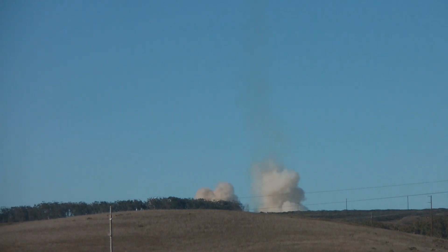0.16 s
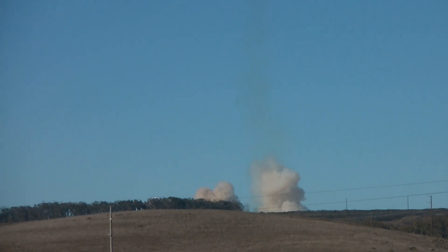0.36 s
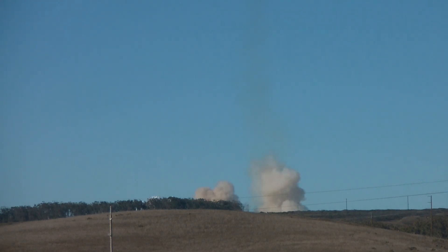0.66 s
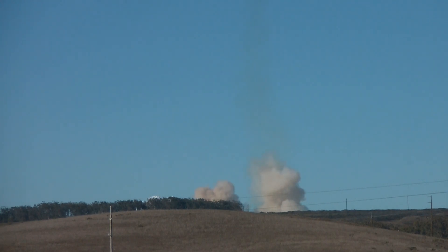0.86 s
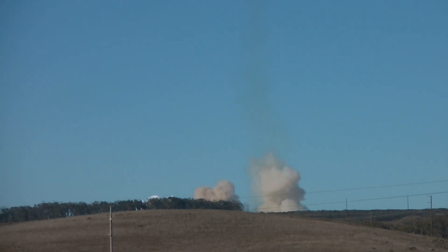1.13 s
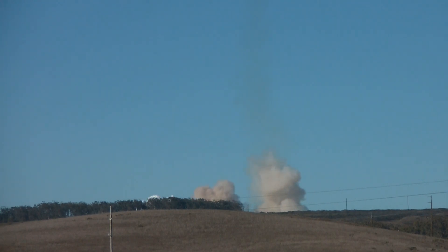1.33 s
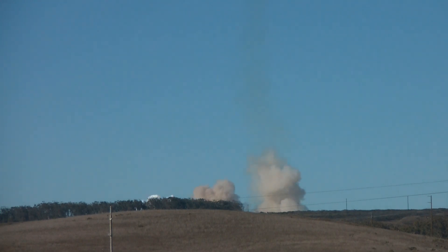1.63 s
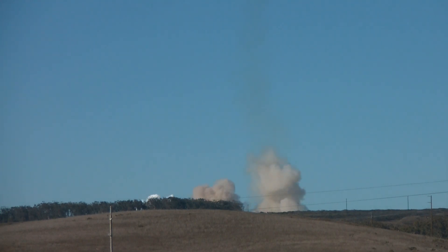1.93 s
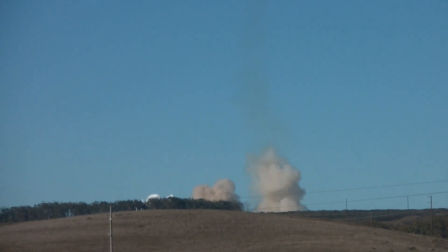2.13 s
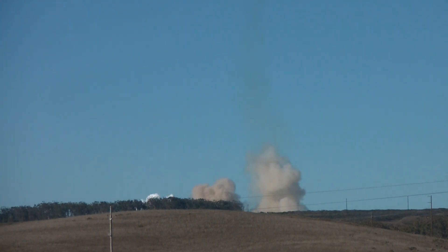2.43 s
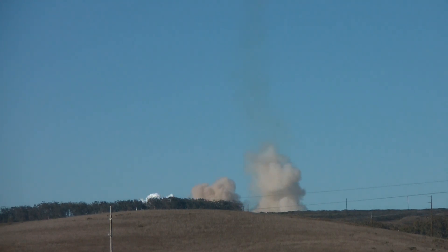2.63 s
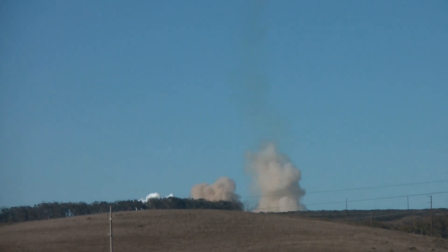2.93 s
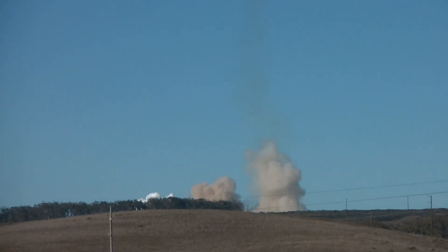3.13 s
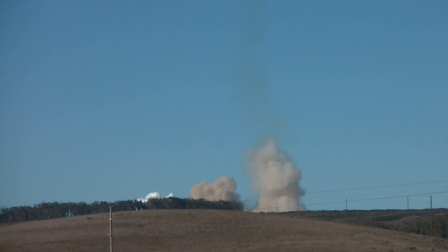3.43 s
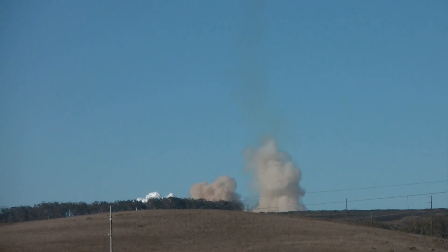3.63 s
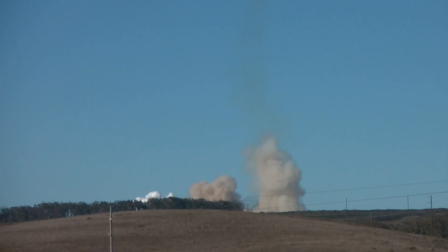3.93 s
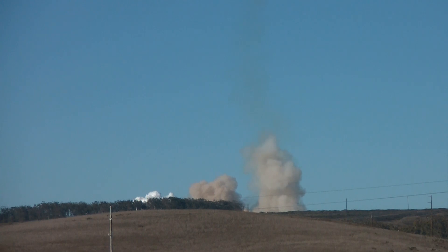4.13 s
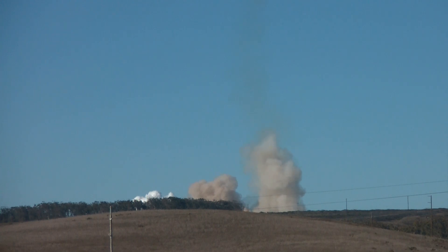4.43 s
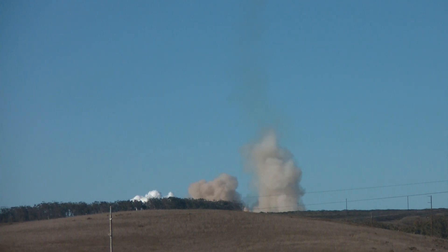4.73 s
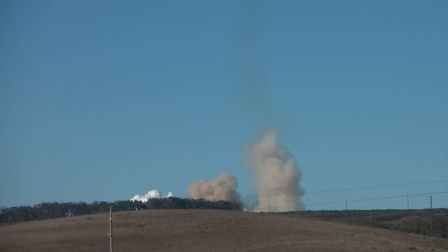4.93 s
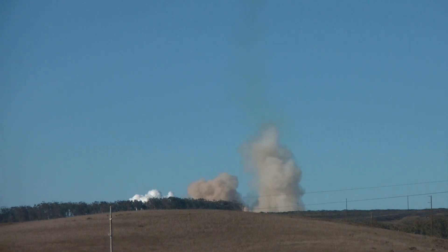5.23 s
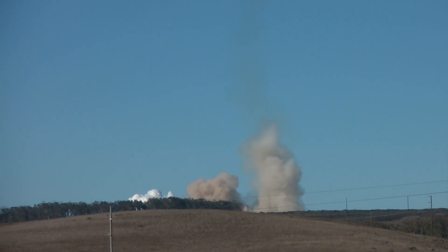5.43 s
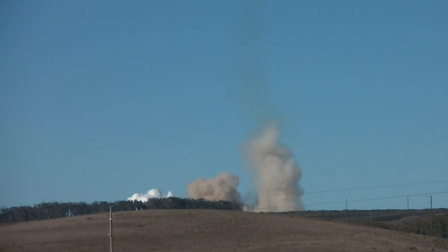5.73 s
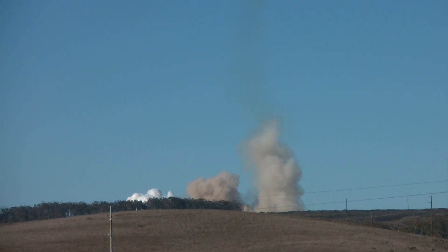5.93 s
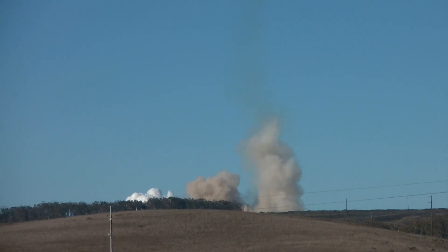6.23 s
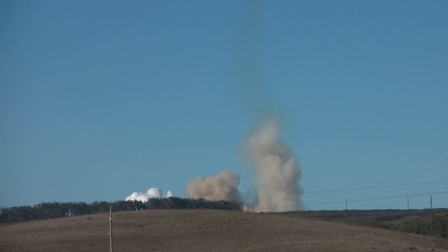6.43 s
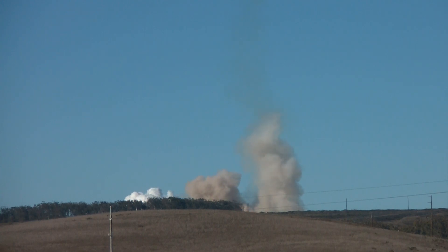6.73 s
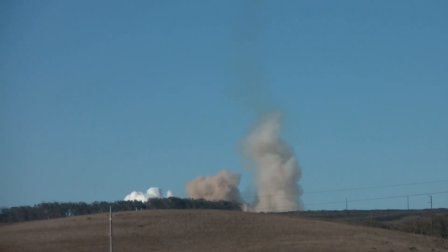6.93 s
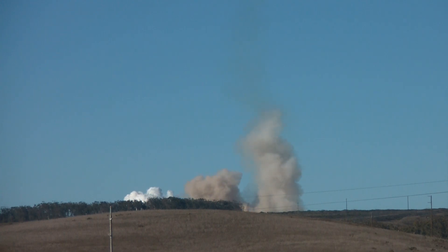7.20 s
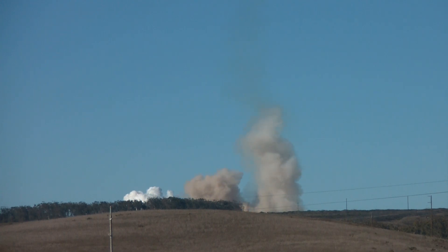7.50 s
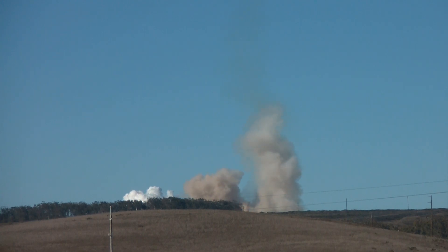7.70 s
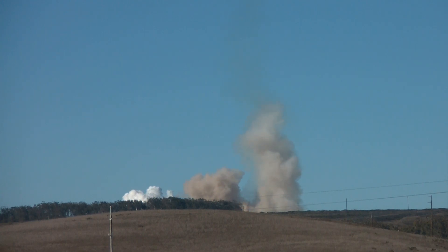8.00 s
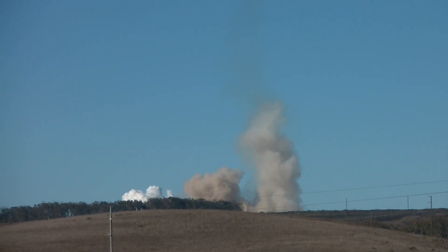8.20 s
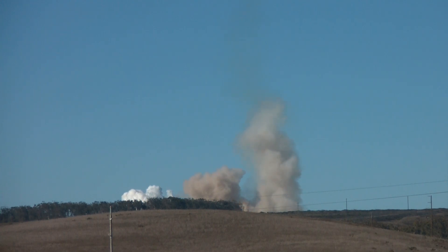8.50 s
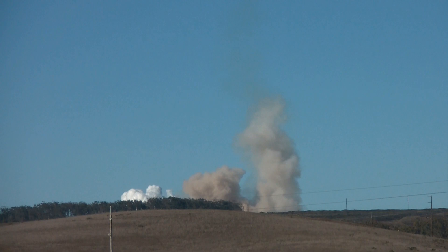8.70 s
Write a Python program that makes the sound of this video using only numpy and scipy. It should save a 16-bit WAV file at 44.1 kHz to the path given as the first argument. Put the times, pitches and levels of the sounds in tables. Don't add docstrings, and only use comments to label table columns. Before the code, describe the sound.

A rocket roars far away over open fields, a dull, deep and very loud rumble that fills the whole stretch. Steep pressure waves overload the stereo microphone, giving irregular dry crackles, thuds and ticks throughout. Faint hiss and gritty distortion lie on top. Close beside the microphone, photo cameras now and then rattle their shutters and give short, high motor whirrs, much quieter than the roar.

```python
import sys
import numpy as np
from scipy import signal
from scipy.fft import rfft, irfft, next_fast_len
from scipy.io import wavfile
from scipy.ndimage import uniform_filter1d

SR = 44100
rng = np.random.default_rng(int(sys.argv[2]) if len(sys.argv) > 2 else 0)


def voltage_ratio(decibels):
    exponent = np.asarray(decibels, float) / 20
    return 10 ** exponent


def store_wav(level_fs):
    pcm = np.round(np.clip(np.atleast_2d(level_fs), -1, 1) * 32767)
    wavfile.write(sys.argv[1], SR, pcm.T.astype(np.int16))


N = 390726
TIME_S = np.arange(N) / SR
FROM_MIDDLE_S = (np.arange(N) - N / 2) / SR
RAIL = 4.2


def rms_one(x):
    return x / np.sqrt(np.mean(x ** 2) + 1e-20)


def at_hz(points, hz):
    table_hz, value = np.array(points).T
    return np.interp(np.log(hz), np.log(table_hz), value)


def drift(rate_hz):
    stride = 40
    pole = np.exp(-2 * stride * np.pi * rate_hz / SR)
    white = rng.standard_normal(N // stride + 2002)
    slow = signal.lfilter([1], [1, -2 * pole, pole * pole], white)[2000:]
    return np.interp(np.arange(N) / stride, np.arange(len(slow)), rms_one(slow))


def wind_cut(hz):
    corner_hz, q = 108, 0.62
    s = 1j * hz / corner_hz
    return s * s / (s * s + s / q + 1)


def swell(start_s, length_s):
    at = np.arange(int(start_s * SR), min(int((start_s + length_s) * SR), N))
    return at, np.sin(np.pi * np.arange(len(at)) / len(at)) ** 0.49


# [s, dB]
STEEP_CRESTS = [(0.463, -20.5), (0.6592, -32.5), (0.6951, -40), (0.912, -30), (1.3662, -18.5), (2.452, -35),
                (2.9501, -20), (3.327, -23), (3.5817, -16), (4.0574, -25), (4.0994, -16), (4.374, -29),
                (4.4208, -28), (4.4633, -13.5), (4.525, -21.5), (4.6472, -16), (4.7198, -20), (4.79, -17),
                (4.829, -19), (5.5587, -14), (5.8528, -26), (6.127, -30), (7.1563, -33), (8.119, -29),
                (8.14, -27), (8.1624, -42), (8.2697, -28), (8.458, -39)]


def surges():
    lull_db, lull_s = -4, 0.0055
    surge_db, surge_s = 5, 0.0091
    t = np.arange(-2000, 2000) / SR
    before = lull_db * np.exp(-(t / lull_s) ** 2)
    after = surge_db * np.exp(-np.abs(t) / surge_s)
    out = np.zeros(N)
    for start_s, _ in STEEP_CRESTS:
        at = int(start_s * SR)
        out[at - 2000:at + 2000] += np.where(t < 0, before, after)
    return uniform_filter1d(out, size=40)


def crests():
    t = np.arange(-200, 200) / SR
    spike = np.exp(-(t / 0.0003) ** 2)
    trough = 0.5 * np.exp(-((t + 0.0012) / 0.00056) ** 2)
    out = np.zeros(N)
    for start_s, peak_db in STEEP_CRESTS:
        at = int((start_s + 0.0015) * SR)
        out[at - 200:at + 200] += voltage_ratio(peak_db + 13) * (spike - trough)
    return out


# [s, dB, dB]
ROAR_LEVELS = [(0, -24, -11.5), (.6, -23, -12), (1, -23, -11), (1.5, -23, -12.5), (2, -21, -12),
               (2.6, -21, -12.5), (3.2, -23, -13), (3.8, -20, -13), (4.2, -20.5, -10), (4.7, -20.5, -12.5),
               (5.4, -22, -11), (5.9, -22.5, -10.5), (6.3, -22, -12.5), (6.7, -24, -10.5),
               (7.2, -22.5, -9.5), (7.7, -23, -10.5), (8.2, -24.5, -12), (8.86, -22, -8)]
# [Hz, dB per Hz]
ROAR_COLOUR = [(12, -37), (20, -11), (49, -1), (70, 2), (98, -2.5), (217, -20), (499, -17.5), (612, -20.5),
               (678, -23.5), (866, -29), (1700, -50), (2600, -69.5), (3380, -89), (5720, -120)]
# [Hz, correlation]
ROAR_LIKENESS = [(30, 0.96), (70, 0.96), (130, 0.96), (300, 0.98), (600, 0.97), (1100, 0.98), (2000, 0.1)]
# [Hz, dB]
ROAR_LEAN = [(30, -0.55), (100, 0.7), (300, 1.6), (600, 1.55), (1100, 2.5), (2000, -2.5)]
# [share of swing, share of swing, dB, dB/s]
ROAR_BANDS = [
    (0, 0.75, 0, 0),
    (0, 0.69, -7.5, -0.89),
    (1, 0, 3, 0),
    (1.199, 0, -8, -0.21),
]


def roar(flicker_db, gust_db):
    size = next_fast_len(N)
    hz = np.maximum(np.fft.rfftfreq(size, 1 / SR), 1)
    mid, side = rfft(rng.standard_normal((2, size)))
    alike = np.clip(at_hz(ROAR_LIKENESS, hz), 0, 1)
    pair = np.sqrt(1 + alike) * mid + np.sqrt(1 - alike) * side * [[1], [-1]]
    pair = pair * voltage_ratio(at_hz(ROAR_COLOUR, hz) + at_hz(ROAR_LEAN, hz) * [[0.5], [-0.5]])
    pair = pair * (hz > 14) / (1 + (hz / 2000) ** 4)
    s, upper_db, deep_db = np.transpose(ROAR_LEVELS)
    gust, surge_db, out = drift(49), surges(), 0
    edges = [(1, 105, 0), (105, 190, 0), (190, 750, 1), (750, 1800, 1.2)]
    for (upper, deep, offset_db, fade), (low, high, share) in zip(ROAR_BANDS, edges):
        level_db = np.mean(upper_db if upper else deep_db) + offset_db + fade * (s - s.mean())
        level_db = level_db + upper * (upper_db - upper_db.mean()) + deep * (deep_db - deep_db.mean())
        inside = 1 / (1 + (low / hz) ** 8) - (high < 1000) / (1 + (high / hz) ** 8)
        heard = np.std(irfft(pair.mean(0) * (hz > low) * (hz < high), size))
        band = irfft(pair * inside / wind_cut(hz), size)[:, :N] / heard
        wobble_db = share * (gust_db * gust + flicker_db * drift(24))
        wobble_db = wobble_db - uniform_filter1d(wobble_db, size=SR // 16)
        out = out + band * voltage_ratio(np.interp(TIME_S, s, level_db) + wobble_db + share * surge_db)
    return out


# [s, dB, dB, dB]
HARD_FRONTS = [(0.0151, -34, 4, -10), (0.168, -27.5, 0.5, -18), (0.3629, -31, -1.5, -7),
               (0.7562, -28, 0.5, -10), (0.798, -26.5, -1.5, -9), (0.819, -27.5, 5.5, -9.5),
               (0.9786, -32, -14, -15), (1.2629, -31.5, -3.5, -7), (1.3142, -31, 2.5, -9.5),
               (1.4094, -26.5, 13.5, -4), (1.4446, -32, 5.5, -5.5), (1.6218, -29.5, -5, -10),
               (1.7002, -28.5, -6, -6.5), (2.9708, -29.5, -3, -3.5), (3.1878, -32, -4.5, -5),
               (3.3883, -31, -2, -12.5), (3.497, -28, 2, -13), (3.5335, -27.5, -7, -8.5),
               (3.9465, -29, -3, -9.5), (4.6747, -29.5, -2.5, -16.5), (4.7224, -27, -3, -9),
               (4.9423, -27.5, 2.5, -14), (5.3063, -26.5, -8.5, -17), (5.5462, -33, 1.5, -11.5),
               (5.5584, -26.5, 0, -15.5), (5.5944, -28, 4.5, -11), (6.048, -31.5, 0, -5),
               (6.7166, -35, -2.5, -6.5), (7.1007, -28, 3, -17), (7.7195, -29.5, 0, -6.5)]
# [s, dB]
FIRM_FRONTS = [(0.5084, 2.5), (0.7612, 2), (0.9374, 0.5), (0.9988, 2.5), (1.232, 1), (2.083, 2.5),
               (2.2158, -0.5), (2.3415, 9.5), (2.4242, 3), (2.6127, 1), (2.905, -0.5), (3.6365, 0.5),
               (4.0082, 0), (4.0411, 4.5), (4.8318, -3), (5.14, 22.5), (5.1825, -3.5), (6.3863, 2),
               (6.459, -1.5), (6.5833, -0.5), (6.7498, -1), (6.8322, -11), (6.876, 0), (7.146, 4),
               (7.268, -24), (7.357, -1.5), (8.054, -4.5), (8.3123, 1.5), (8.3705, -0.5), (8.765, 20.5)]
# [s, dB, dB, dB]
LIGHT_TICKS = [(0.02, -34.5, 3.5, -23), (0.0554, -30, -3, -8), (0.0691, -39, -3.5, -11),
               (0.0825, -31.5, -0.5, -12), (0.1168, -33.5, 17.5, -4.5), (0.1476, -33.5, -7.5, -2),
               (0.1557, -34, -15, -23), (0.1987, -32, 1.5, -22), (0.2457, -37, -15.5, -3.5),
               (0.2531, -34.5, -8.5, -19.5), (0.2589, -30, 5.5, -6), (0.2732, -34, -21, -4),
               (0.3211, -30, -1.5, -14.5), (0.3836, -32, -15.5, -1), (0.4225, -32.5, -8.5, -15),
               (0.443, -34.5, 3.5, -11.5), (0.4662, -31, 7.5, -0.5), (0.5607, -35, 22, -16.5),
               (0.6754, -33, 3, -8.5), (0.7678, -32, -8.5, -6), (0.804, -29, -8, -13.5),
               (0.8736, -30.5, -4, -4), (0.906, -38, -6, -16), (1.1182, -37.5, -4, -9.5),
               (1.2431, -33, 1.5, -10), (1.4151, -36, -2, -11.5), (1.438, -37, -4.5, -8),
               (1.5508, -30, 1.5, -4.5), (1.5568, -31.5, 9, -18), (1.5812, -31, 16.5, -10.5),
               (1.6075, -29, -4, -8), (1.6373, -33, -7.5, -18), (1.7454, -37.5, -11.5, -9.5),
               (1.8232, -28.5, 1.5, -14), (1.8533, -33, 7.5, -2.5), (1.8661, -27, -1, -13.5),
               (1.8784, -30, 1.5, -6), (1.9264, -38, -10, -14), (1.9697, -35.5, -9.5, -8),
               (2.0167, -30, 1.5, -3.5), (2.0418, -31, 16.5, 1.5), (2.0627, -31, 5, -15.5),
               (2.1359, -36, 1, -7.5), (2.1483, -37.5, -12.5, -12.5), (2.1875, -32, -8, -17),
               (2.2444, -31.5, 0.5, -12.5), (2.2613, -30.5, -18, -12), (2.3362, -31, -3.5, -9.5),
               (2.3772, -32.5, -28, -4.5), (2.4825, -27, 0.5, -4),
               (2.5051, -31, -2.5, -9.5), (2.585, -30.5, -2, -2.5), (2.6217, -35, -1, -13),
                (2.638, -35, -14, -8.5), (2.7191, -33, -15.5, -13), (2.751, -29, 15.5, -12.5),
                (2.77, -33, -15.5, -13), (2.8436, -30.5, 2, -1.5), (3.0723, -29, 3, -4.5),
                (3.077, -33.5, -12, -8.5), (3.1272, -31.5, 8.5, -1), (3.1353, -29, -22, -3.5),
                (3.3215, -30.5, 4.5, -4.5), (3.393, -31, -4, -13), (3.4195, -33.5, -13, -14),
                (3.436, -33.5, -3, -14), (3.5823, -28, 1.5, -18), (3.7916, -33.5, 8.5, -3.5),
                (3.9294, -30.5, -25, -10.5), (3.9543, -34.5, 6, -14.5), (4.0125, -27.5, -6, -15.5),
                (4.1008, -30, -2.5, -7.5), (4.1472, -27.5, -4, -12), (4.174, -32, -4.5, -0.5),
                (4.1948, -32.5, 25.5, -4.5), (4.2276, -29.5, -8, 0.5), (4.3006, -34, 17.5, -1.5),
                (4.3216, -33.5, 15.5, -4.5), (4.4166, -28.5, 10.5, 1), (4.4767, -38.5, 12, -13),
                (4.5033, -35, 22, -1.5), (4.5325, -27.5, 2.5, -2.5), (4.5666, -27, -13.5, 1),
                (4.5736, -31.5, 18, -1), (4.609, -36, 13.5, -4), (4.6693, -31, -2.5, -5),
                (4.7434, -31, -0.5, -6.5), (4.791, -28.5, -3.5, -15), (4.8645, -38.5, -16, -18),
                (4.896, -31, -16.5, -5), (5.021, -38, -16, -13), (5.038, -33.5, -24.5, -4),
                (5.0706, -32, 21.5, -1), (5.2796, -30, 1, -8.5), (5.3004, -37.5, -3.5, -18),
                (5.3376, -29, 0.5, 1.5), (5.3765, -30.5, -2.5, -3.5), (5.4224, -32.5, -16.5, -2),
                (5.4442, -31, -2, -8.5), (5.4609, -32, -6.5, -18),
               (5.5544, -37, -5, -17), (5.6308, -40.5, -5, -15.5), (5.666, -30, 6.5, -4.5),
              (5.732, -37.5, -24, -10), (5.7835, -29.5, 1.5, -4.5), (5.7908, -35, -2.5, -14.5),
              (5.8045, -27, -3, -4), (5.8223, -31.5, -11, -9), (5.8379, -43, 22.5, -4),
              (5.8911, -33, 4, -4.5), (5.959, -35.5, -18.5, -2), (6.023, -33, 21, 0),
              (6.1034, -32, -18, -0.5), (6.2726, -31, 2, -3.5), (6.3162, -33.5, -11.5, 0),
              (6.3222, -32.5, -23, -14), (6.3525, -33.5, -15.5, -14.5), (6.3574, -31, 4.5, -3.5),
              (6.4658, -26.5, 5.5, -17.5), (6.51, -34, 9.5, 0), (7.1214, -26.5, -1.5, -3),
              (7.1955, -37, 2, 2.5), (7.2138, -31.5, -6, -2.5), (7.2498, -34, 11, -11),
              (7.3325, -35, 6.5, -1), (7.409, -36, -9.5, -15), (7.4228, -35.5, -15.5, -15.5),
              (7.443, -33, -20.5, -10.5), (7.4988, -36, -6.5, -16.5), (7.536, -37, -16.5, -2),
              (7.779, -35, 18, -3.5), (7.806, -29.5, 0.5, -5.5), (7.8202, -33, -6, -21),
              (7.8274, -30.5, 13, -7.5), (7.889, -32.5, 1, 1), (7.935, -32.5, -15.5, -0.5),
              (7.9505, -34, -18, -13), (7.9586, -32, -12.5, 1), (8.0998, -28.5, 0, -5.5),
              (8.1054, -33, -5.5, -5), (8.143, -37, -22.5, -21), (8.223, -35, 21, -5),
              (8.6033, -33, 21.5, -2.5), (8.6256, -33, 3, -3.5), (8.701, -35, 2.5, -4),
              (8.7059, -36, -3, -13.5), (8.7722, -29.5, -20.5, -6), (8.809, -32, 23, -10)]
# [s, dB, dB]
FAINT_TICKS = [(0.1003, -37.5, -13.5), (0.21, -37, -7.5), (0.3117, -38, -3.5), (0.355, -38.5, -10),
               (0.4949, -35.5, -9), (0.532, -34.5, 1), (0.5545, -39, -10.5), (0.58, -39.5, -15.5),
               (0.6282, -41.5, -1.5), (0.8923, -37, -8.5), (0.9499, -37.5, -9.5), (1.086, -39, -10.5),
               (1.1105, -37, -4.5), (1.1462, -37.5, -0.5), (1.353, -38, -10.5), (1.359, -37, -17),
               (1.3837, -34, -4), (1.614, -37, -6), (1.6673, -35, -1), (2.2332, -36.5, -11),
               (2.2845, -36, -13.5), (2.3483, -37, 3.5), (2.4166, -43.5, -6.5), (2.5131, -35.5, -4),
               (2.567, -37.5, -2), (2.7423, -41, 10), (2.7781, -40.5, -15), (2.8052, -35, 2),
               (2.8607, -37.5, -5.5), (3.0663, -38, -7.5), (3.406, -38, -12.5), (3.453, -38.5, -5.5),
               (3.5032, -37.5, -16), (3.5731, -36, 2), (3.7208, -37.5, -5), (4.2075, -36, -6.5),
               (4.312, -38.5, -14), (4.648, -37, -1), (4.736, -39.5, -11), (5.0302, -35.5, -4),
               (5.1613, -38.5, 1.5), (5.3213, -33.5, -9), (5.3852, -37.5, -0.5), (5.4993, -39, -11.5),
               (5.5178, -38, -20), (6.143, -37.5, -10), (6.4896, -35, -6.5), (6.5965, -35.5, -3.5),
               (6.798, -35.5, -5.5), (6.888, -40, -7), (6.9367, -38.5, -24), (7.3036, -36.5, -10.5),
               (7.461, -40, 0.5), (7.5052, -41.5, -8), (7.7927, -40.5, -7.5), (7.893, -37, -17),
               (8.2736, -34.5, 1), (8.4234, -39, -9.5), (8.48, -39, 17), (8.7815, -35.5, 10)]
# [s, dB, dB, dB]
LAST_TICK = (8.8565, -33, 0, -3)
FIRM_DB = -30.5


def fronts():
    faint = [(*row, -11.5) for row in FAINT_TICKS]
    ticks = np.vstack([LIGHT_TICKS, faint])
    ticks = ticks + [0, -2, 0, -2.5]
    ticks = ticks[ticks[:, 0] > 0.003]
    firm = [(s, FIRM_DB, lean_db, -7) for s, lean_db in FIRM_FRONTS]
    s, level_db, lean_db, bright_db = np.vstack([HARD_FRONTS, firm, ticks, [LAST_TICK]]).T
    left_db, right_db = (level_db + 8 - 10 * np.log10(1 + voltage_ratio(2 * sign * lean_db)) for sign in (-1, 1))
    return np.transpose([s, left_db, right_db, np.maximum(bright_db + 5, -20)])


def swings(pressure):
    size = next_fast_len(N)
    hz = np.maximum(np.fft.rfftfreq(size, 1 / SR), 1)
    heard = irfft(rfft(pressure.mean(0), size) * wind_cut(hz), size)
    swing_hz, swing_s, lag_s, tip_s, tip_share = 84.4, 0.0075, 0.002, 0.0006, 0.4
    t = np.arange(-800, 800) / SR
    wave = np.cos(2 * np.pi * swing_hz * t) * np.exp(-((t - lag_s) / swing_s) ** 2)
    wave = (1 - tip_share) * wave + tip_share * np.exp(-(t / tip_s) ** 2)
    push = np.zeros(size + 2400)
    heard = np.pad(heard, (800, 1600))
    for s, left_db, right_db, _ in sorted(map(tuple, fronts())):
        span = slice(int(s * SR), int(s * SR) + len(t))
        now = heard[span] + push[span]
        harder_db = (left_db + right_db) / 2 - FIRM_DB
        height = np.clip(0.5 + 0.03 * harder_db, 0, 0.7)
        way = np.sign(now @ wave)
        push[span] += way * max(height - way * now[len(t) // 2], 0) * wave
    return irfft(rfft(push[800:800 + size]) * (hz > 25) / wind_cut(hz), size)[:N]


def overload(pressure, graze_per_s, graze_db):
    stick_s, rise_s = 0.003, 0.00025
    out = RAIL * np.tanh(pressure / RAIL)
    hits = fronts()
    t = np.arange(-100, 400) / SR
    corner = voltage_ratio(21.5) * np.exp(np.where(t < 0, t / rise_s, -t / 0.0026))
    snap = voltage_ratio(11.5) * (t >= 0) * np.exp(-np.abs(t) / 0.0001)
    for (s, *peak_db, sharp_db), luck in zip(hits, rng.random(len(hits))):
        at, hold = int(s * SR), int(stick_s * SR * (0.4 + 1.2 * luck))
        share = np.clip((voltage_ratio(sharp_db) - 0.33) / 0.65, 0, 1)
        fizz = voltage_ratio(-9) * rng.standard_normal(len(t)) * np.exp(-np.abs(t) / np.where(t < 0, 0.0014, 0.003))
        fizz = signal.lfilter([0.3], [1, -0.7], fizz)
        tick = (1 - share) * corner + share * snap + fizz
        tick = signal.lfilter([0.8], [1, -0.2], tick) / (1 + voltage_ratio(sharp_db))
        grip = np.concatenate([np.hanning(80)[:40], np.ones(hold), np.hanning(hold)[hold // 2:]])
        span = slice(at - 40, at - 40 + len(grip))
        for ch in (0, 1):
            late = np.roll(tick, rng.integers(0, 9))
            bounced = late - 0.45 * np.roll(late, rng.integers(8, 40))
            near_rail = np.clip((peak_db[ch] + 47) / 14, 0, 1) * np.clip(abs(out[ch, at]) / 1.38, 0, 1)
            flatter = out[ch, at] - out[ch, span]
            out[ch, span] += 0.61 * near_rail * grip[:N - span.start] * flatter
            kick = np.sign(out[ch, at]) * voltage_ratio(peak_db[ch])
            out[ch, at - 100:at + 400] += kick * bounced[:N - at + 100]
    cluster = voltage_ratio(3.5 * drift(20) - 0.6 * FROM_MIDDLE_S)
    grazes = rng.random((2, N)) < graze_per_s / SR * (pressure / 1.4) ** 2 * cluster
    sizes_db = graze_db + 3.4 * np.minimum(rng.exponential(1, (2, N)), 3)
    graze = uniform_filter1d(corner, size=4) + 0.26 * snap
    return out + signal.fftconvolve(grazes * voltage_ratio(sizes_db) * np.sign(pressure), [graze], "same", axes=1)


def haze(pressure):
    band = signal.butter(2, [1500, 3180], "band", fs=SR, output="sos")
    white = rng.standard_normal((3, N))
    drive = np.minimum(np.abs(pressure.mean(0)), RAIL / 2) ** 3
    grain = signal.sosfilt(band, (white[0] + 0.56 * white[1:]) * drive)
    return voltage_ratio(-66.5 - 2 * FROM_MIDDLE_S + 1.6 * drift(4.9)) * rms_one(grain)


# [Hz, dB per Hz]
HISS_COLOUR = [(1500, -6.5), (2500, -11.5), (3200, -9), (5000, -14), (8000, -18), (10000, -18.5),
               (12800, -22), (14500, -39)]


def hiss():
    hz = np.maximum(np.fft.rfftfreq(N, 1 / SR), 1)
    breath_db = 1.2 * drift(6) + 1.8 * drift(40)
    white = rng.standard_normal((2, N)) + 0.6 * rng.standard_normal(N)
    noise = irfft(rfft(white) * voltage_ratio(at_hz(HISS_COLOUR, hz)) * (hz > 1500), N)
    return voltage_ratio(-66.5 + breath_db) * rms_one(noise)


# [s, s, Hz, dB]
SHUTTER_RATTLES = [(0.301, 0.05, 7500, -66), (1.065, 0.13, 6900, -59.5), (2.23, 0.11, 8470, -59.5),
                   (2.33, .08, 6000, -67), (2.394, 0.13, 8870, -64), (2.509, .11, 5500, -63.5),
                   (4.494, 0.045, 7640, -57.5), (4.548, 0.04, 7030, -60.5), (4.6, .13, 8900, -67),
                   (5.273, 0.11, 5550, -57), (5.383, 0.02, 9030, -58), (6.786, .08, 8860, -62),
                   (7.073, 0.062, 5980, -61.5), (7.18, .04, 7000, -55.5), (7.87, .1, 8940, -59.5),
                   (8.192, 0.11, 5460, -60.5), (8.297, 0.039, 5940, -55.5), (8.606, 0.13, 5180, -63)]
# [s, dB]
MIRROR_KNOCKS = [(0.3327, -41), (0.3735, -38), (5.5778, -39.5), (5.7444, -50), (5.7555, -46), (7.0543, -50),
                 (7.643, -47.5), (8.4994, -41), (8.523, -36.5), (8.5627, -33.5)]


def shutters():
    out = np.zeros((2, N))
    knocks = [(s, 0.0059, 10000, peak_db - 17) for s, peak_db in MIRROR_KNOCKS]
    for s, length_s, hz, level_db in SHUTTER_RATTLES + knocks:
        at, shape = swell(s, length_s)
        ticks = rng.standard_normal((2, 6000))[:, :len(at)]
        ticks = ticks * voltage_ratio(3.9 * rng.standard_normal(6000))[:len(at)]
        lumps = np.interp(np.arange(len(at)) / (0.004 * SR), np.arange(40), rng.standard_normal(40))
        ticks = ticks * voltage_ratio(6.5 * lumps)
        band = signal.butter(1, [hz / 2, min(hz * 1.2, SR / 2.2)], "band", fs=SR, output="sos")
        rattle = signal.sosfilt(band, ticks[0] + 0.8 * ticks[1] * [[1], [-1]])
        out[:, at] += voltage_ratio(level_db + 6.5) * shape * rms_one(rattle)
    return out


# [s, Hz, dB]
LONG_WINDS = [(.43, 2510, -72), (1.18, 2510, -73), (2.395, 2500, -73), (4.612, 2550, -68),
              (8.61, 2550, -67)]
# [s, s, dB]
SHORT_WINDS = [(1.165, .075, -68), (2.565, .045, -69), (5.395, .05, -65), (7.213, .04, -65),
               (8.33, .04, -64)]
# [multiple of gear pitch, dB]
GEAR_HARMONICS = [(2, 0), (3, -3), (4, -5), (5, -3), (6, -7)]


def winders():
    out = np.zeros((2, N))
    # start_s, length_s, pitch_hz, sag share, rise share, level_db, brightness_db
    winds = [(s, 0.11, hz, 0.07, 0, db, 1) for s, hz, db in LONG_WINDS]
    winds += [(s, length_s, 2275, 0, 0.9 * length_s, db, -3) for s, length_s, db in SHORT_WINDS]
    for s, length_s, hz, sag, rise, level_db, bright_db in winds:
        at, shape = swell(s, length_s)
        along = np.linspace(0, 1, len(at))
        stutter = np.interp(along * length_s / 0.009, np.arange(20), rng.standard_normal(20))
        shape = shape * voltage_ratio(3.5 * stutter - 1.5)
        wander = 0.009 * np.cumsum(rng.standard_normal(6000))[:len(at)] / np.sqrt(len(at))
        speed = 1 - sag * np.sin(np.pi * along ** 0.79) ** 0.5 + rise * along + wander
        turn = 2 * np.pi * np.cumsum(hz * speed) / SR
        jitter = np.cumsum(0.03 * rng.standard_normal(6000))[:len(at)]
        for k, gear_db in GEAR_HARMONICS:
            tone_db = level_db + 2 + gear_db + 1.4 * bright_db * (k - 3) + 30 * sag
            rough_db = 3.1 * rng.standard_normal(len(at))
            out[:, at] += voltage_ratio(tone_db + rough_db) * np.sqrt(2) * shape * np.sin(k * (turn + jitter))
    return out


def scene():
    pressure = roar(flicker_db=1.33, gust_db=1.71) + crests()
    pressure = voltage_ratio(-1.5) * pressure
    pressure = pressure + swings(pressure)
    crackling = overload(pressure, graze_per_s=70, graze_db=-48)
    return crackling + shutters() + winders() + hiss() + haze(pressure)


def limiter(x, ceiling_db, release_db_per_s):
    ramp_db = release_db_per_s * TIME_S
    over_db = np.maximum(20 * np.log10(np.abs(x).max(0) + 1e-9) - ceiling_db, 0)
    duck_db = np.maximum.accumulate(over_db + ramp_db) - ramp_db
    return x * voltage_ratio(-0.6 * signal.lfilter([0.01], [1, -0.99], duck_db))


def band_limit(x):
    return signal.sosfilt(signal.butter(12, 15800, fs=SR, output="sos"), x)


def record(dry):
    size = next_fast_len(N + SR // 10)
    cut = irfft(rfft(dry, size) * wind_cut(np.fft.rfftfreq(size, 1 / SR)), size)[:, :N]
    cut = limiter(voltage_ratio(2) * cut, ceiling_db=-2.5, release_db_per_s=54.5)
    return band_limit(np.clip(cut, -1, 1))


dry = scene()
out = record(dry)
store_wav(out)
```